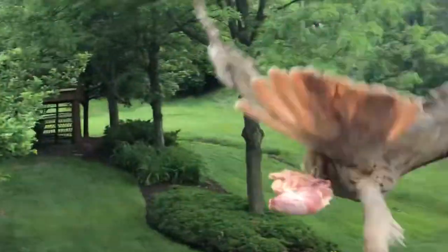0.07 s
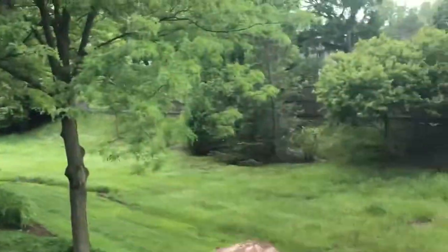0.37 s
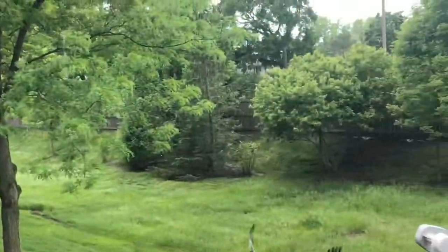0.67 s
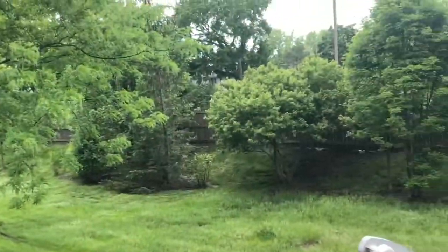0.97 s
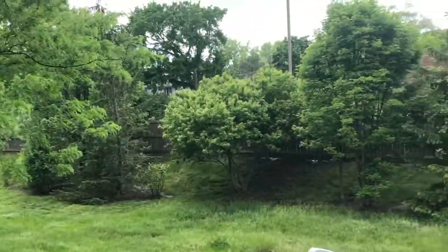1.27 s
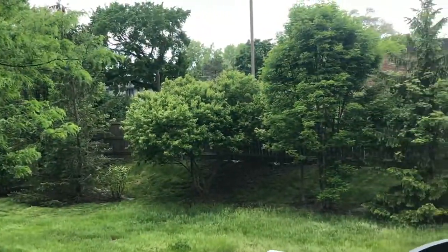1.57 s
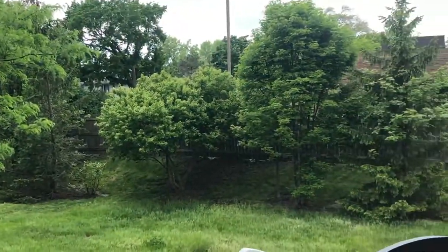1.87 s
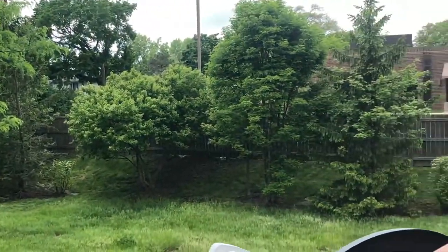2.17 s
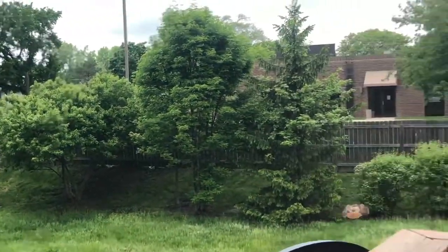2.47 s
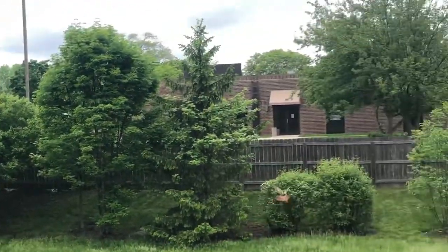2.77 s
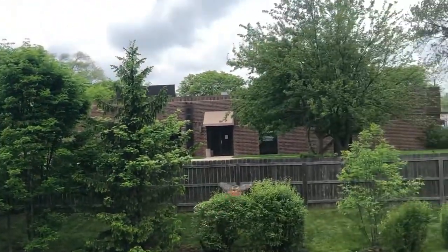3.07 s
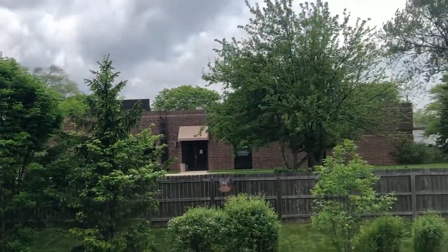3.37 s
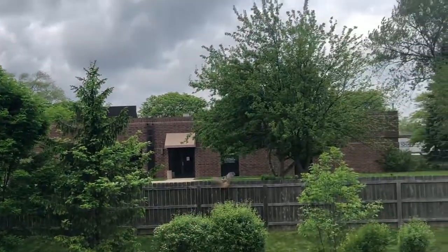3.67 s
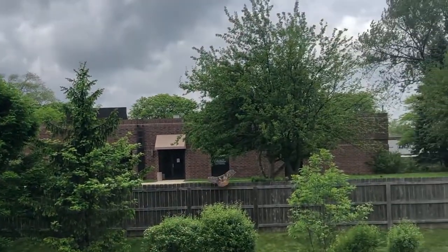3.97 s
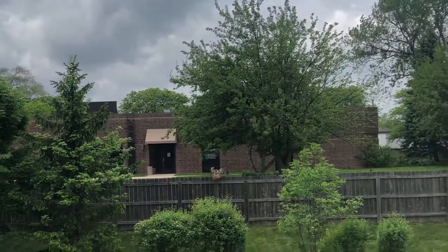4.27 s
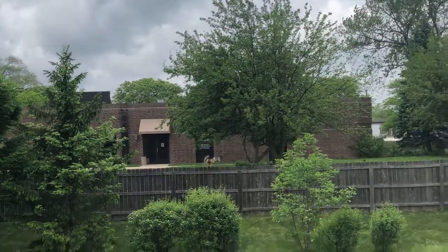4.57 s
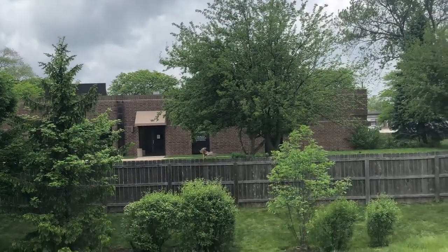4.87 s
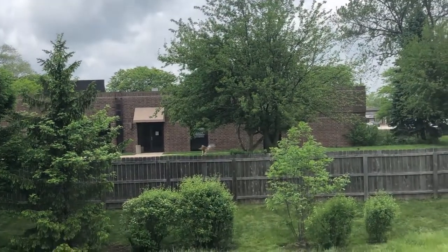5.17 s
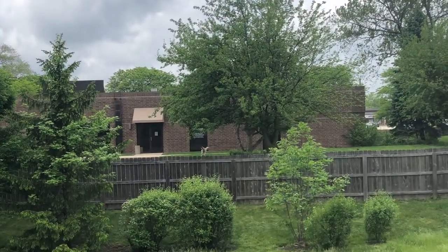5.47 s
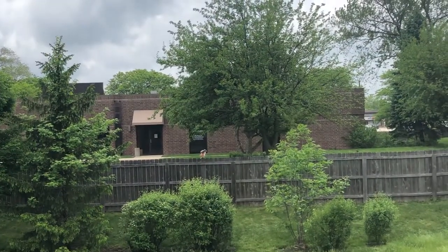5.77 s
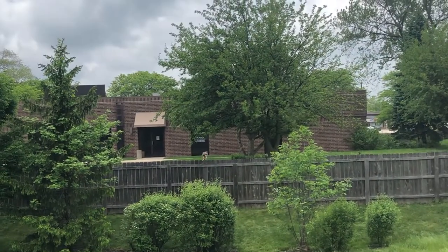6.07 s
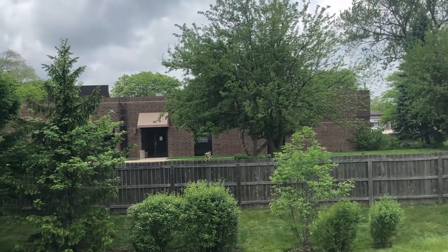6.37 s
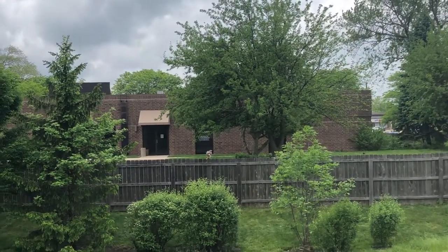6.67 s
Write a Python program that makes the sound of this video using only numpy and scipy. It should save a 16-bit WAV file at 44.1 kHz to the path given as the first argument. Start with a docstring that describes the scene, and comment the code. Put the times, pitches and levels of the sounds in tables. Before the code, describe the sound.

In a garden, a hawk flaps away from the microphone with a few faint, feathery swishes and light ticks. Small birds chirp throughout, one clear and high, the other lower and hoarser, often falling in pairs about once a second and echoing lightly off walls and trees. Distant traffic rumbles underneath, and in the second half a heavy engine drones louder and slowly rises in pitch.

```python
"""Garden birds and a hawk leaving

Beside a garden, small birds chirp, mostly in pairs, while a hawk flaps away from the microphone.
Each chirp has two voices, one from each side of the syrinx: they sweep up, hold, and the lower one
flicks down. Walls and trees throw the chirps back. In the distance, traffic hums behind the trees
and a heavy engine slowly picks up speed."""
import sys
import numpy as np
from scipy import signal
from scipy.fft import rfft, irfft
from scipy.io import wavfile

SR = 44100
rng = np.random.default_rng(int(sys.argv[2]) if len(sys.argv) > 2 else 0)


def transcribe(signal):
    """Save signal, clipped to [-1, 1], as a 16-bit WAV file at the path in sys.argv[1]."""
    frames = np.atleast_2d(signal).T
    limited = np.clip(frames, -1, 1)
    pcm = np.round(limited * 32767).astype(np.int16)
    wavfile.write(sys.argv[1], SR, pcm)


N = 301203
T = np.arange(N) / SR


def birds():
    """A clear high chirp and a lower, hoarser one repeat, each with its own echoes off the garden."""
    # both kinds of chirp: t/s, hold/s, lower voice f/Hz, upper voice f/Hz, note level/dB,
    # then relative to the note: upper voice/dB, sum tone/dB, rasp/dB
    clear_chirps = [(0.893, 0.061, 4335, 6820, -38.5, -17.5, -24, -24),
                    (1.845, 0.059, 4274, 6770, -38.5, -15.5, -27, -31),
                    (2.653, 0.067, 4367, 6830, -35, -17, -30, -34),
                    (3.658, 0.064, 4330, 6800, -35, -17, -29, -22),
                    (4.405, 0.063, 4318, 6750, -33.5, -18.5, -25, -23),
                    (5.285, 0.059, 4317, 6790, -34, -17, -26, -29),
                    (6.095, 0.057, 4294, 6790, -33, -18.5, -28, -17.5),
                    (6.786, 0.077, 4390, 6940, -34, -18.5, -27, -19)]
    hoarse_chirps = [(0.739, 0.047, 3930, 6700, -42, -16, -26, -15.5),
                     (2.046, 0.047, 3930, 6680, -40.5, -13, -26.5, -19),
                     (2.557, 0.047, 3950, 6790, -40.5, -14, -24, -16),
                     (3.772, 0.051, 3955, 6740, -42, -13, -21.5, -17),
                     (4.508, 0.052, 3976, 6600, -48.5, -8.5, -15, -7.4),
                     (5.283, 0.046, 3950, 6580, -45.5, -20.5, -21, -7.5),
                     (6.497, 0.053, 3955, 6651, -45, -15, -22, -11)]
    out = np.zeros(N)
    loudest_db = max(row[4] for row in clear_chirps)
    for row in clear_chirps:
        start, call = chirp(
            row, lock_s=0.0033, lock_width_s=0.0026, ease_s=0.05, ease_db=-15.5,
            rise_db=12, flick_db=13, lead_db=7, upper_fade_db_per_s=69,
            jitter=0.0062, onset_jitter=0.031, sag=1, rasp_lead_s=0.019, rasp_decay_s=0.032,
            difference_db=-23, octave_db=-25, upper_octave_db=-14, fan_db=-4)
        # the weaker a chirp arrives, the more its far echoes are lifted, so they stay strong
        away_db = loudest_db - row[4]
        echoed = garden(call, echo_db=-0.6, air_hz=7040, far_db=1.74 * away_db, wall_db=-26)
        add(out, start, amp(-1.46) * echoed)
    for row in hoarse_chirps:
        start, call = chirp(
            row, lock_s=0.0056, lock_width_s=0.0024, ease_s=0.033, ease_db=-7.5,
            rise_db=6.5, flick_db=8.5, lead_db=10.5, upper_fade_db_per_s=73,
            jitter=0.0084, onset_jitter=0.014, sag=0.897, rasp_lead_s=0.025, rasp_decay_s=0.056,
            difference_db=-17, octave_db=-24, upper_octave_db=-28, fan_db=2.5)
        echoed = garden(call, echo_db=1, air_hz=14000, far_db=3.5, wall_db=-24.5)
        add(out, start, amp(-0.24) * echoed)
    return out


def chirp(row, *, lock_s, lock_width_s, ease_s, ease_db, rise_db, flick_db, lead_db,
          upper_fade_db_per_s, jitter, onset_jitter, sag, rasp_lead_s, rasp_decay_s,
          difference_db, octave_db, upper_octave_db, fan_db):
    """The syrinx's two voices modulate each other over a rasp of air; returns start time and sound."""
    # overtones on the rise: multiple of the lower voice, relative level/dB
    fan_partials = [(1.5, -3), (2, 0), (2.5, -9), (3, -15), (3.5, -22), (4, -22)]
    # spectrum of the rushing air: f/Hz, relative level/dB
    rasp_spectrum = [(1500, -58), (2600, -2.5), (4500, -1.5), (6500, 3.5), (7200, -5.5), (10000, -13.5),
                     (12500, -7), (15500, -31)]
    at, hold, low_hz, high_hz, note_db, upper_db, sum_db, rasp_db = row
    t = np.arange(-2200, 4400) / SR  # zero where the rise meets the held note
    after_hold = np.maximum(t - hold, 0)
    held = np.clip(1 - after_hold / 0.0035, 0, 1)
    # both voices sweep up and sag; the closing flick drops the lower one by 40 %
    sagging = sag * (np.maximum(t, 0) - 0.021)
    low_glide = sweep(t, oct_per_s=37) * 2 ** (-1.584 * sagging)
    high_glide = sweep(t, oct_per_s=29) * 2 ** (-0.34 * sagging)
    drop = 1 - 0.4 * (1 - np.exp(-(after_hold / 0.00405) ** 1.4))
    # the membranes are less steady when not locked on the held note
    unsteady = jitter + onset_jitter * np.clip(-t / 0.018, 0, 1) + 0.063 * (1 - held)
    low_phase = phase_of(low_hz * low_glide * drop * (1 + unsteady * wander(580, len(t))))
    high_phase = phase_of(high_hz * high_glide * (1 + unsteady * wander(610, len(t))))
    # the lower voice is weak on the rise, rings out once it locks, eases off, then swells in the flick
    note = step(t, lock_s, lock_width_s) * amp(2 + ease_db * step(t, ease_s, 0.0086))
    rise = amp(rise_db) * bump(t, -0.0048, 0.0092)
    flick = amp(flick_db) * bump(t, hold + 0.0064, 0.0047)
    lower_voice = (note * held + amp(upper_db) * (rise + flick)) * np.sin(low_phase)
    # the upper voice leads, gains its octave near the top of the rise and fades through the hold
    contour_db = lead_db * (1 - step(t, -0.0022, 0.0067)) - upper_fade_db_per_s * np.maximum(t, 0)
    upper_level = step(t, -0.024, 0.00067) * amp(contour_db)
    octave = amp(upper_octave_db) * np.clip((high_glide - 0.7) / 0.18, 0, 1)
    upper_wave = np.sin(high_phase) + octave * np.sin(2 * high_phase)
    upper_voice = amp(upper_db) * upper_level * held * upper_wave
    # combination tones follow both voices, and swell and fade by chance
    tones = ((sum_db, low_phase + high_phase), (difference_db, high_phase - low_phase),
             (octave_db, 2 * low_phase))
    combination = sum(amp(db + 2.3 * wander(50, len(t))) * np.sin(phase) for db, phase in tones)
    combination *= np.sqrt(note * upper_level) * held
    # alternate cycles differ at the start: a fan of whole and half overtones climbs with the pitch
    fan = sum(amp(db) * np.sin(k * low_phase) for k, db in fan_partials)
    fan *= amp(upper_db + fan_db) * bump(t, -0.021, 0.0095)
    # air rushes in with the rise and eases off through the hold
    breath = np.exp(-t / rasp_decay_s) * step(t, -rasp_lead_s, 0.0042)
    rasp = amp(rasp_db + 0.5) * breath * held * noise(rasp_spectrum, len(t))
    sound = np.sqrt(2) * (lower_voice + upper_voice + combination + fan) + rasp
    return at + t[0], amp(note_db) * sound * signal.windows.tukey(len(t), 0.08)


def chirp_echo(at_s=3.906, top_hz=6860):
    """A faint, thin echo of a hoarse chirp's rising upper voice comes back across the garden."""
    hz = top_hz * sweep(T - at_s - 0.005, oct_per_s=20) * (1 + 0.018 * wander(700))
    echo = np.sqrt(2) * amp(-50.5) * bump(T, at_s, 0.014) * np.sin(phase_of(hz))
    return garden(echo, echo_db=1)[:N]


def garden(sound, echo_db, air_hz=9000, far_db=0, wall_db=-21, wall_s=0.14, tail_t60_s=1.0):
    """Walls and trees return clusters of echoes over a thin dying tail; long paths lose treble."""
    # echo clusters: delay/s, spread/s, relative level/dB
    clusters = [(.006, 0.0065, -4.5), (.026, 0.013, -9.5), (.062, 0.037, -14), (0.158, 0.018, -19),
                (.2, .02, -28.5), (0.31, 0.027, -25.5)]
    t = T[:SR]
    tail = amp(-60 * t / tail_t60_s) * np.clip(t / 0.058, 0, 1)
    power = (amp(-18) * unit(tail)) ** 2
    for delay, spread, db in clusters:
        power += (amp(db) * unit(bump(t, delay, spread) * (t > 0.002))) ** 2
    sparse = unit(rng.standard_normal(SR) * (rng.random(SR) < 1500 / SR))
    taps = amp(echo_db) * np.sqrt(power / SR) * sparse
    f = np.fft.rfftfreq(SR, 1 / SR)
    dull = irfft(rfft(taps) / (1 + (f / air_hz) ** 4), SR)
    far = np.clip(t / 0.21, 0, 1)
    taps = (1 - far) * taps + far * amp(far_db) * dull
    taps[0] = 1  # the direct path to the microphone
    taps[round(wall_s * SR)] += amp(wall_db + far_db)  # one clean slap off the far wall
    return signal.fftconvolve(sound, taps)


def wings():
    """The hawk's feathers brush the air in soft, grainy swishes; a few light ticks sound close by."""
    # swishes: t/s, width/s, level/dB
    wingbeats = [(.04, 0.03, -59), (.1, 0.018, -61.5), (.2, 0.1, -67.5), (.312, .018, -64.5),
                 (.52, 0.1, -68.5), (3.21, 0.037, -73)]
    # ticks near the microphone: t/s, level/dB
    ticks = [(.069, -49), (.205, -53), (.305, -55), (.996, -57), (1.035, -63)]
    # spectrum of swishes and ticks: f/Hz, relative level/dB
    feather_spectrum = [(800, -23), (2000, -14), (4000, 4), (9000, 1.5), (15000, -5.5)]
    level = swells(wingbeats) * amp(2.3 * wander(200))
    for at, db in ticks:
        add(level, at, amp(db) * np.exp(-T[:1000] / 0.0017))
    return level * noise(feather_spectrum)


def engine(idle_hz=115.3, creep_hz_per_s=2.1, step_hz=12):
    """A distant heavy engine: its firing rate creeps up, with one quicker step as it pulls away."""
    # drone at the firing rate: t/s, level/dB
    drone_levels = [(0, -68), (2.4, -54), (3.1, -44.5), (4.3, -42), (4.65, -44.5), (5.3, -37.5),
                    (6.3, -50.5), (6.6, -42), (6.83, -46.5)]
    # booms of the overtone at 1.5 times that rate: t/s, width/s, level/dB
    booms = [(6.34, 0.1, -46), (6.73, 0.14, -44)]
    firing_hz = idle_hz + creep_hz_per_s * T + step_hz * step(T, 4.25, 0.149)
    phase = phase_of(firing_hz * (1 + 0.0054 * wander(7.3)))
    level = amp(follow(drone_levels))
    orders = ((1, level), (1.5, level * amp(-16) + swells(booms)), (2, level * amp(-17)))
    return np.sqrt(2) * sum(gain * amp(1.47 * wander(8.4)) * np.sin(k * phase) for k, gain in orders)


def exhausts(pass_s=4.75, pass_width_s=1.0, pass_hz=57.5, rise_hz_per_s=2.4, surge_hz=72.6):
    """One deep exhaust note rises slowly, loudest as it passes; a second surges on one pitch."""
    # surges of the second exhaust: t/s, width/s, level/dB
    surges = [(.39, 0.061, -38.5), (.79, 0.18, -41), (1.32, .07, -36)]
    passing_level = amp(-38.5) / (1 + ((T - pass_s) / pass_width_s) ** 2)
    passing = throb(pass_hz + rise_hz_per_s * (T - pass_s), passing_level)
    return np.sqrt(2) * (passing + throb(surge_hz, swells(surges)))


def throb(hz, level):
    """A low exhaust note, unsteady in pitch and strength."""
    strength = level * amp(1.7 * wander(6.5))
    return strength * np.sin(phase_of(hz * (1 + 0.0099 * wander(13.7))))


def traffic(road_db=-49, car_s=4.06):
    """Tyre roar and rumble from a road behind the trees; one passing car lifts the roar a little."""
    # spectra of the roar and the rumble: f/Hz, relative level/dB
    tyre_spectrum = [(15, -37), (25, -50), (50, -1.5), (75, -2.5), (129, -2.5), (183, -11), (260, -7),
                     (399, -16.5), (537, -16.5), (741, -14.5), (1020, -15.5), (4260, -35), (4750, -39),
                     (15500, -59)]
    rumble_spectrum = [(20, -22), (35, -33), (48, -5), (58, -3.5), (78, 10), (100, -11), (150, -10.5),
                       (200, -20), (260, -10.5), (400, -19), (800, -54)]
    # rise and fall of the rumble: t/s, level/dB
    rumble_levels = [(0, -47), (.35, -44.5), (1.35, -42.5), (1.7, -52), (3.4, -49), (4, -45), (5.7, -52),
                     (6.83, -47)]
    roar = noise(tyre_spectrum)
    midband = signal.sosfilt(signal.butter(4, [400, 1800], "band", fs=SR, output="sos"), roar)
    midband_db = road_db + 1.66 * bump(T, car_s, 0.59) + 0.51 * wander(14)
    roar *= amp(midband_db) / midband.std()
    return roar + noise(rumble_spectrum) * amp(follow(rumble_levels))


def amp(db):
    """Decibels as an amplitude factor."""
    return 10 ** (np.asarray(db) / 20)


def unit(x):
    """The signal scaled to rms 1."""
    return x / np.sqrt(np.mean(x ** 2) + 1e-20)


def phase_of(hz):
    """Running phase in radians of a changing frequency."""
    return 2 * np.pi * np.cumsum(hz) / SR


def follow(rows):
    """Straight lines through (t/s, value) points, over the whole scene."""
    return np.interp(T, *np.transpose(rows))


def add(mix, at, sound):
    """Mix a sound in, starting at the given second."""
    part = mix[max(round(at * SR), 0):][:len(sound)]
    part += sound[:len(part)]


def noise(spectrum, size=N):
    """Noise of rms 1 with the given (f/Hz, level/dB) spectrum."""
    hz, db = np.transpose(spectrum)
    f = np.fft.rfftfreq(size, 1 / SR)
    gain = amp(np.interp(np.log(f + 1), np.log(hz), db))
    return unit(irfft(rfft(rng.standard_normal(size)) * gain, size))


def wander(rate_hz, size=N):
    """Smooth random drift of rms 1, moving up to about the given rate."""
    f = np.fft.rfftfreq(size, 1 / SR)
    gain = np.exp(-(f / rate_hz) ** 2) * (f > 0)
    return unit(irfft(rfft(rng.standard_normal(size)) * gain, size))


def bump(t, at, width):
    """A smooth swell of height 1."""
    return np.exp(-((t - at) / width) ** 2 / 2)


def swells(rows):
    """The envelope of a few smooth swells, each (t/s, width/s, level/dB)."""
    return sum(amp(db) * bump(T, at, width) for at, width, db in rows)


def step(t, at, width):
    """A smooth rise from 0 to 1."""
    return (1 + np.tanh((t - at) / width / 2)) / 2


def sweep(t, oct_per_s, knee_s=0.00233):
    """Pitch factor that climbs steadily and levels off at 1 as t passes 0."""
    return 2 ** (-oct_per_s * knee_s * np.logaddexp(0, -t / knee_s))


def scene():
    """The garden and the distant road at one microphone."""
    return (birds() + chirp_echo() + traffic() + engine() + exhausts() + wings())[None]


def record(dry, edge_hz=15720):
    """The recorder's band limit cuts the highest treble."""
    lowpass = signal.firwin(511, edge_hz, window=("kaiser", 9), fs=SR)
    return signal.oaconvolve(dry, lowpass[None], "same")


dry = scene()
out = record(dry)
transcribe(out)
```